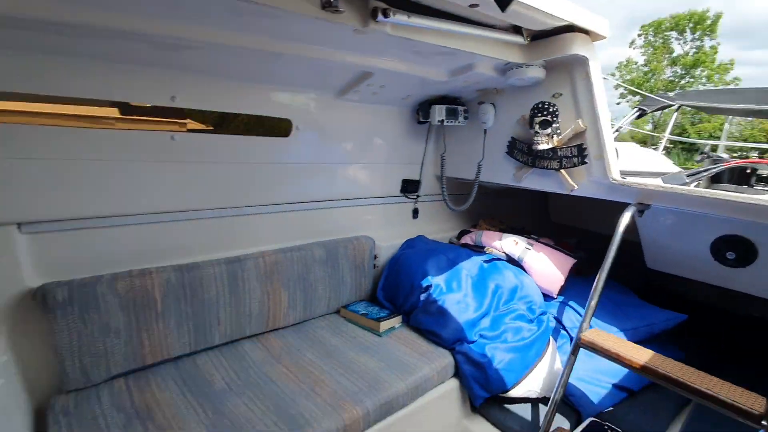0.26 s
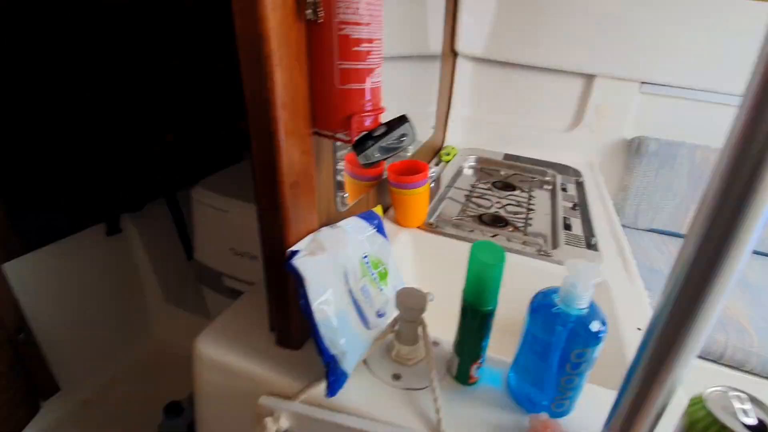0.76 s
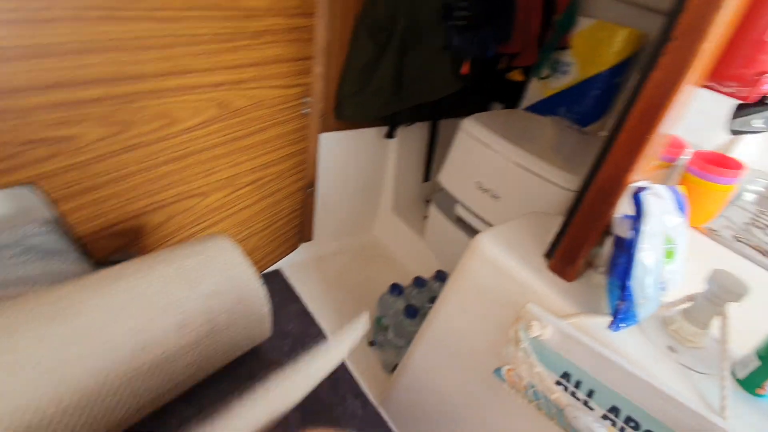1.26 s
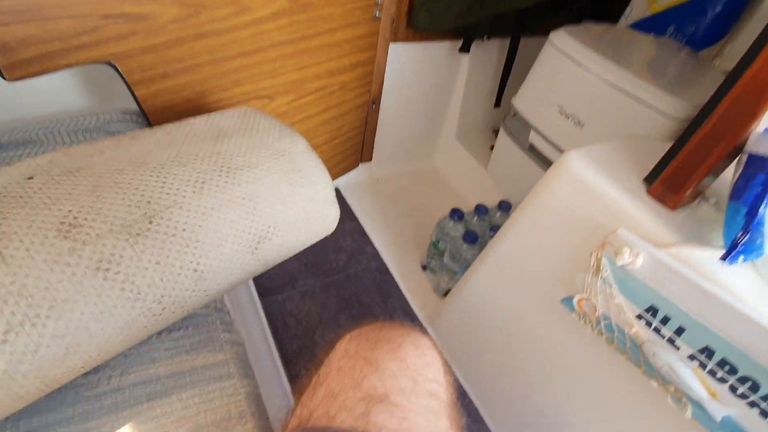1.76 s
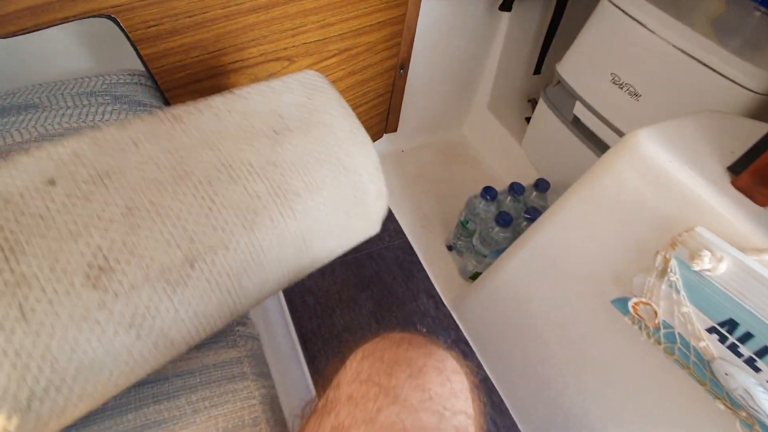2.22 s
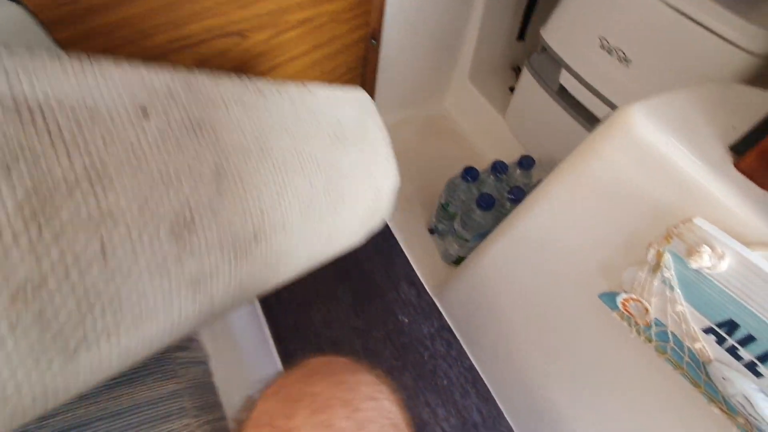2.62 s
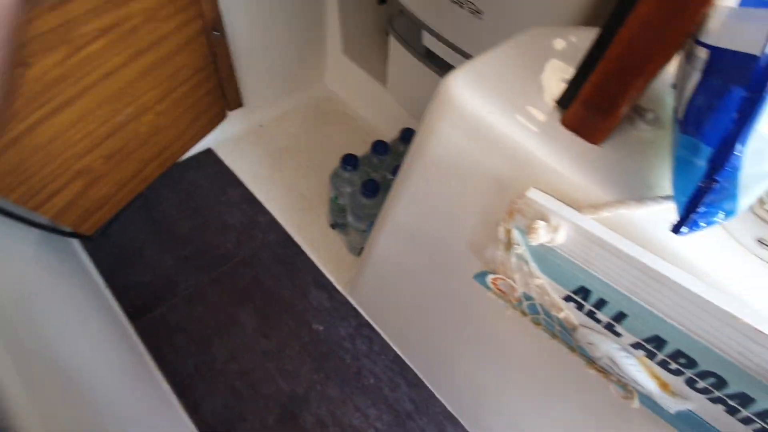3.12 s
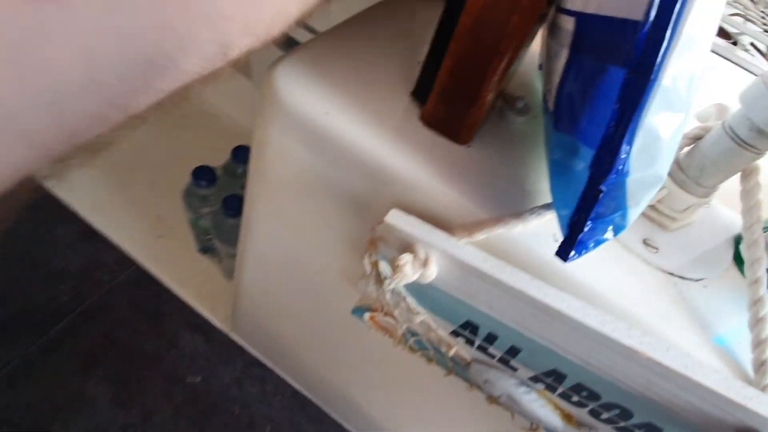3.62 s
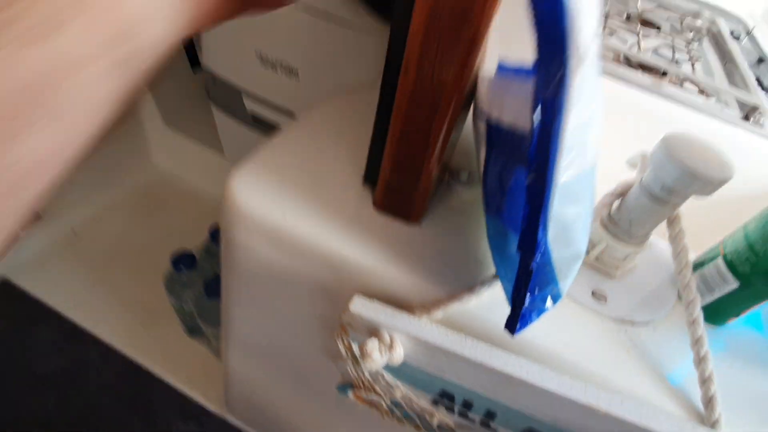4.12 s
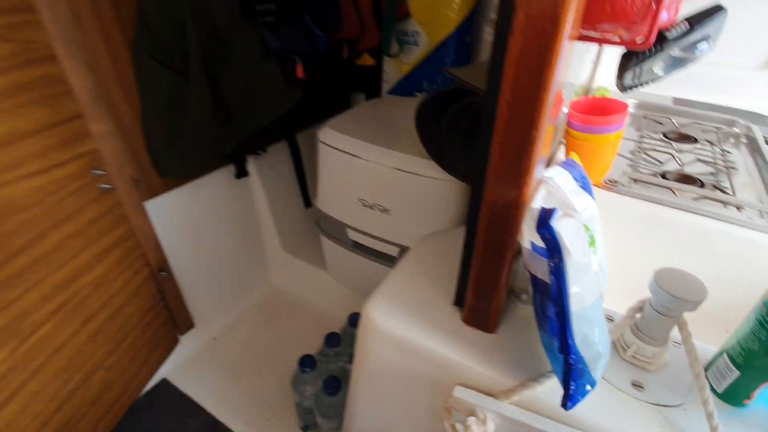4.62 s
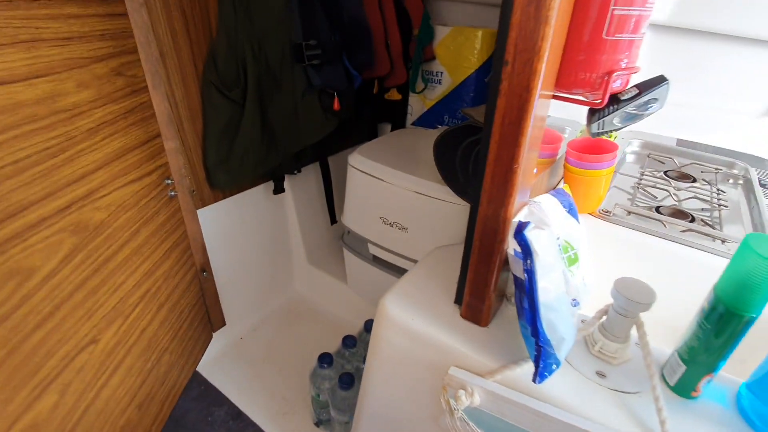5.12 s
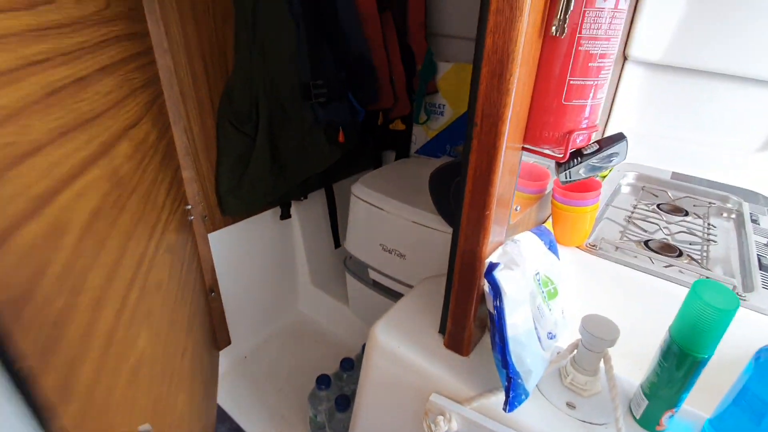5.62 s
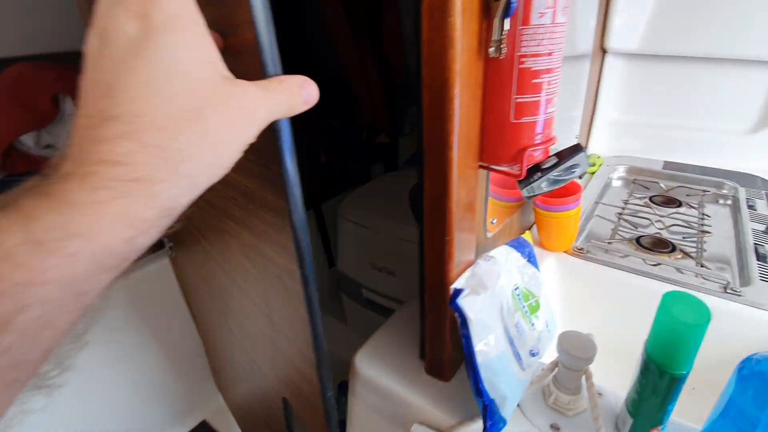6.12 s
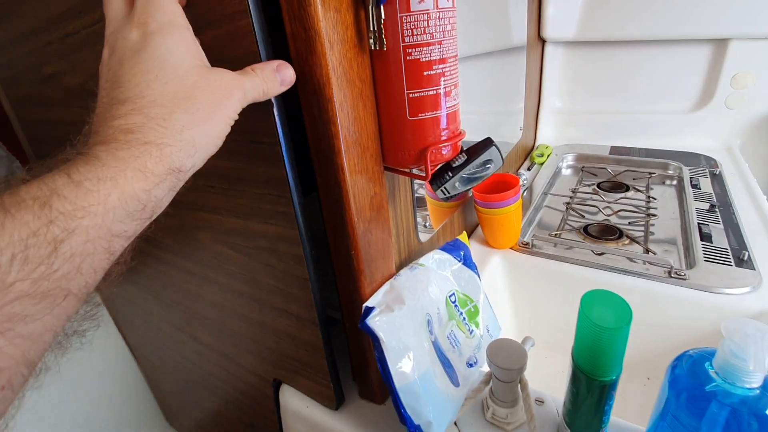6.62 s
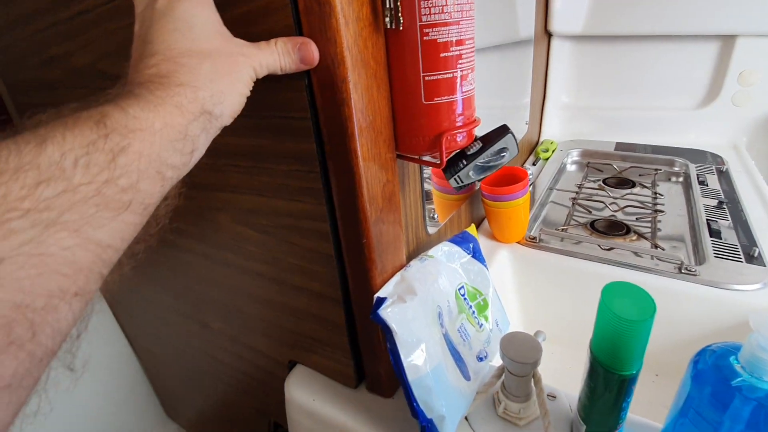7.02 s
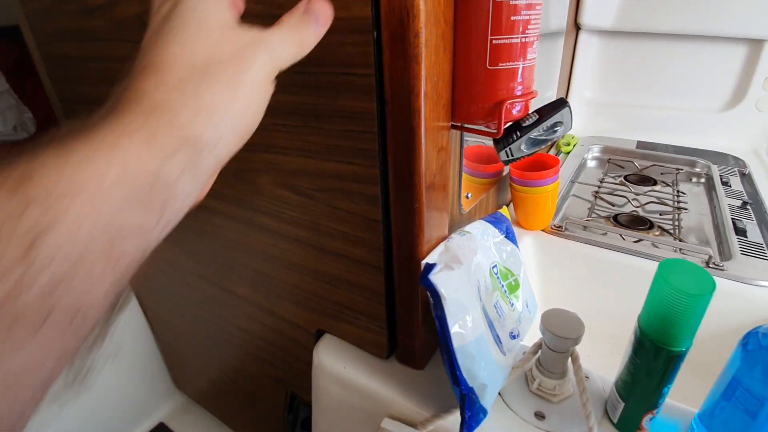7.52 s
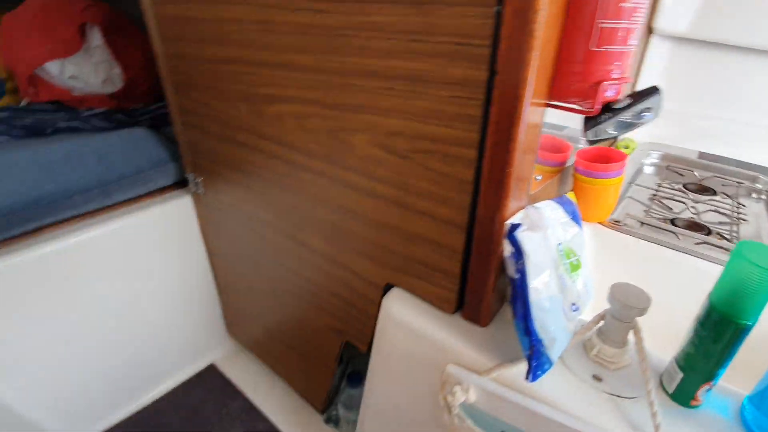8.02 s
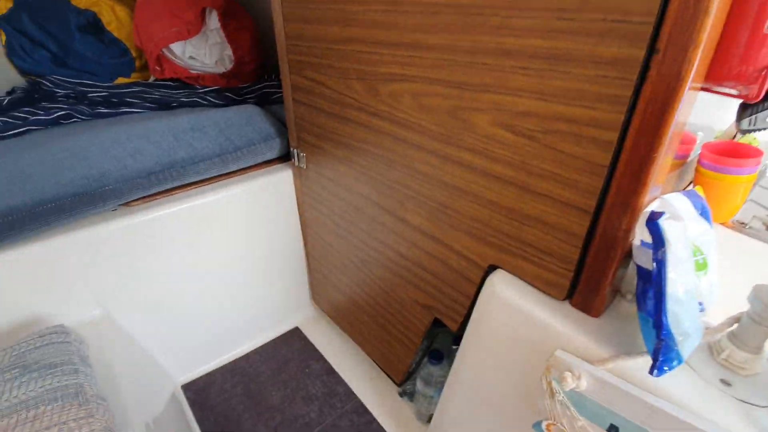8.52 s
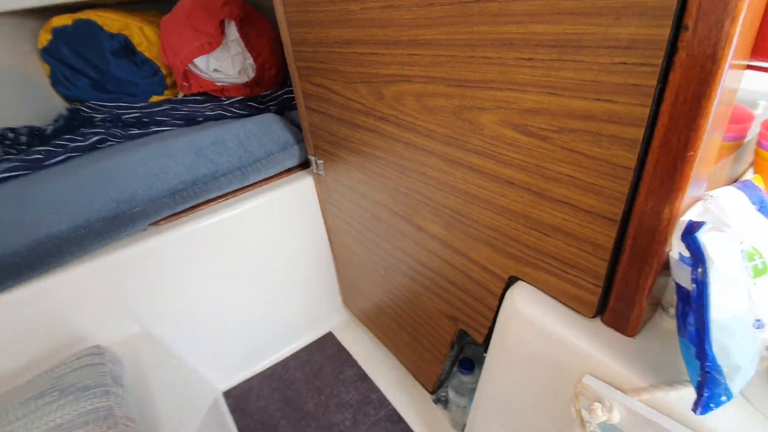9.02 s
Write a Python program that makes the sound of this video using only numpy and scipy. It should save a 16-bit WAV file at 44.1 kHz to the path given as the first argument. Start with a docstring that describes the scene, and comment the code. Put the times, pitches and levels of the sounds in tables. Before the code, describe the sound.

A small boat cabin with low hull rumble and faint motor hum. Close by, a cushion is rubbed and shifted with soft bumps, then lands with a loud, boomy cluster of thuds and hard knocks. Quieter taps follow, a faint hinge flutter, a door thumping shut with a click, and a last burst of cloth rustle. Close stereo microphone, leaning slightly to one side.

```python
"""First a low rumble of hull and water, faint air and distant motor hum inside a small boat cabin.
Close by, someone moves about: cloth rustles, a cushion is handled and dropped, a latch clicks, a door shuts.
Cloth, air and rumble are shaped noise; knocks and ticks are noise bursts through resonances.
Blows ring the hull panels as decaying sines, motors are wavering sines, hinge and scrape are narrow noise.
Two microphone ports hear most of it from one side."""
import sys
import numpy as np
from scipy import signal
from scipy.fft import rfft, irfft, next_fast_len
from scipy.io import wavfile
from scipy.ndimage import uniform_filter1d

SR = 44100
rng = np.random.default_rng(int(sys.argv[2]) if len(sys.argv) > 2 else 0)


def store_pcm(level_fs):
    """Save levels as 16-bit WAV."""
    pcm = np.round(np.clip(level_fs, -1, 1) * 32767).astype(np.int16)
    wavfile.write(sys.argv[1], SR, np.atleast_2d(pcm).T)


N = 408366
FFT_N = next_fast_len(N)
T, HZ = np.arange(N) / SR, np.fft.rfftfreq(FFT_N, 1 / SR)

# Rumble of water and hull around the cabin. Each row: time in seconds, level in dB.
RUMBLE_LEVEL = [(0, -51.5), (.3, -50), (1, -54.5), (2.2, -54), (3.4, -56), (4.5, -55.5), (5.5, -56),
                (6.6, -53), (7.8, -56.5), (9.26, -51.5)]
# Colour of the rumble. Each row: frequency in Hz, density in dB per Hz.
RUMBLE_COLOUR = [(8.8, -40.5), (15, 3.5), (43, 7), (57, -1.5), (97, -3), (145, -2), (189, -21.5),
                 (300, -25), (390, -55.5), (660, -120)]
# Colour of the cabin air. Each row: frequency in Hz, density in dB per Hz.
AIR_COLOUR = [(120, -33), (200, -2.5), (305, 2.5), (394, -12.5), (465, 1), (836, -24), (1160, -25),
              (1980, -14.5), (3130, -21), (7540, -27), (8900, -37.5), (14100, -23), (16000, -41)]
AIR_DB = -72.5

# Motor heard far off, the stronger one. Each row: time in seconds, pitch in Hz, level in dB.
NEAR_MOTOR = [(4.4, 127.4, -58), (5.3, 131.1, -59), (6, 131.4, -48), (6.7, 132.5, -46), (7.6, 135.9, -49.5),
              (8.4, 139, -49.5), (9.26, 136.5, -51.5)]
# Motor further off, heard early. Each row: time in seconds, pitch in Hz, level in dB.
FAR_MOTOR = [(0, 159.6, -62.5), (.6, 158.5, -62.5), (1.4, 153, -70), (2.4, 163.8, -74), (3.5, 170, -81)]
# Drone joining late. Each row: time in seconds, pitch in Hz (sounded at 0.99 of it), level in dB.
LATE_DRONE = [(7.4, 92, -67.5), (8, 91, -53), (8.6, 88.65, -52.5), (9.26, 91.6, -54)]
# Deep throb through the hull. Each row: time in seconds, pitch in Hz, level in dB.
THROB = [(0, 32.18, -58), (2, 31.5, -47), (4.5, 31.5, -52.5), (6.5, 32.1, -52), (9.26, 31, -53)]
# Partials of the stronger motor. Each row: multiple of the pitch, level in dB added to the curve.
NEAR_ORDERS = [(1, -2)]
# Partials of the further motor. Each row: multiple of the pitch, level in dB added to the curve.
FAR_ORDERS = [(1, 3), (2, -15.5), (3, -10)]

# Steady rustle of moving about, close by. Each row: time in seconds, body level in dB,
# crisp treble in dB re body, dull lows in dB re body.
RUSTLE = [(0, -82.5, -6, 7), (.5, -82.5, -2, 2), (.72, -74.5, -8.5, 5), (1.0, -62.5, -9, 0),
          (1.3, -78, 2.5, 2.5), (1.55, -55.5, -10.5, -5), (2.25, -53, -11.5, -8.5), (2.93, -61, -8, -1.5),
          (3.47, -64, -1.5, -1.5), (3.99, -60, -10, 8), (4.22, -79, -0.5, 5.5), (5.2, -72, -8, -1),
          (6.0, -77.5, -3, 6), (6.6, -72.5, -5.5, 8), (7.33, -92.5, -5.5, 16), (7.96, -67.5, -3, -0.5),
          (8.5, -63, -8, -2.5), (8.89, -54.5, -6.5, -0.5), (9.05, -60, -7, -2.5), (9.12, -70.5, 1.5, 0),
          (9.26, -65, -0.5, -0.5)]
# Single strokes of cloth or skin. Each row: start in seconds, length in seconds, peak position as a
# share of the length, peak level in dB, crisp treble in dB re peak, dull lows in dB re peak.
STROKES = [(0.845, 0.093, 0.45, -62.5, 2, -8), (1.071, 0.23, 0.35, -59.5, 1.5, -4.5),
           (1.413, 0.091, 0.67, -58.5, -8.5, -9), (1.521, 0.12, 0.6, -41, -9, -18),
           (1.646, 0.095, 0.52, -49.5, -7.5, -16), (1.915, 0.076, 0.61, -43.5, -14, -9),
           (2.015, 0.13, 0.24, -42.5, -16, -12), (2.15, 0.074, 0.64, -52, -8, -32),
           (2.287, 0.063, 0.47, -37, -14, -11), (2.315, 0.64, 0.15, -45, -11, -15),
           (2.646, 0.064, 0.5, -55, -10, -16), (2.702, 0.25, 0.44, -57, -3.5, -25),
           (4.785, 0.16, 0.16, -74.5, 6, -7), (4.892, 0.23, 0.12, -68, -0.5, -2.5),
           (5.377, 0.67, 0.19, -71.5, 2, -5.5), (6.786, 0.26, 0.51, -57, -6, -5),
           (7.124, 0.081, 0.21, -63, -9.5, 1.5), (7.198, 0.14, 0.26, -72, -3.5, 11),
           (7.994, 0.13, 0.42, -57.5, -2.5, -10), (8.165, 0.1, 0.38, -59, -12, -6),
           (8.297, .1, 0.43, -58, -10.5, -7), (8.516, 0.28, 0, -60, -8, -9)]
# Body of the rubbed cloth. Each row: frequency in Hz, density in dB per Hz.
CLOTH_BODY = [(410, -38), (700, -9), (922, -9), (1620, -0.5), (1790, 1), (2170, -3), (3090, -11.5),
              (3800, -17), (4960, -24), (5500, -20.5), (7150, -51.5)]
# Crisp treble of the cloth. Each row: frequency in Hz, density in dB per Hz.
CLOTH_TREBLE = [(2350, -29), (4000, -5.5), (4960, -12.5), (7060, -9.5), (9770, -19), (12400, -12),
                (15100, -16.5), (16000, -28)]
# Dull lows of the cloth. Each row: frequency in Hz, density in dB per Hz.
CLOTH_LOWS = [(120, -36), (200, 0.5), (307, 3), (377, -3.5), (471, 7.5), (644, -7.5), (845, -9.5),
              (1100, -14), (1430, -39), (2420, -120)]

# Light ticks of small hard parts. Each row: start in seconds, level in dB, ring in Hz,
# rise in seconds, t60 in seconds.
TICKS = [(.855, -52, 840, 0.007, 0.16), (1.865, -45, 2900, .0005, .03), (4.161, -55.5, 2690, .008, 0.1),
         (4.799, -59.5, 6100, .0004, 0.11), (5.839, -64.5, 3890, .01, 0.24),
         (5.868, -64, 2650, 0.0025, 0.12), (5.87, -65.5, 4140, 0.0091, 0.17),
         (5.914, -67, 3930, .012, 0.19), (6.497, -67, 2490, 0.00095, 0.046), (6.778, -59, 835, .002, 0.27),
         (7.043, -43, 3170, .0002, 0.053), (7.044, -55, 1025, .001, 0.15),
         (8.538, -52.5, 2440, .0005, 0.04), (8.592, -58, 4550, .0005, 0.055)]
SHARPNESS, CHATTER_S = 2.1, 0.0061  # ring Hz per Hz of width; a rise this slow halves the width

# Blows into the hull. Each row: start in seconds, peak in dB, pitch in Hz of the panel struck,
# left minus right in dB, damping as a factor on the ring time.
THUMPS = [(1.601, -37, 330, 3, 0.64), (2.285, -41, 40, -1, 0.99), (2.549, -48, 304, 3, 0.99),
          (2.671, -39.5, 263, 2, 0.68), (3.568, -12.5, 81.5, 2.5, 1.94), (3.609, -23, 66.5, 2, 5.6),
          (3.684, -14.5, 46.8, 1, 3.7), (3.719, -7.5, 49, 2.5, 0.69), (3.723, -21, 480, -1, 0.34),
          (3.767, -11, 56, 5.5, 1.8), (3.812, -13.5, 71.7, 14, 1.47), (3.853, -24, 53.2, -6, 0.48),
          (3.945, -21.5, 56, 10, 1.5), (3.998, -31, 40.7, 12, 1.3), (4.083, -30, 45.1, 12, 0.98),
          (4.128, -46, 311, 2, 0.49), (4.203, -38, 45, 6, 1.44), (4.798, -42.5, 88.5, 3, 2.7),
          (4.861, -38, 47.2, 0.5, 1.5), (4.949, -36, 138, 1.5, 1.3), (6.501, -52.5, 398.6, -1, 0.34),
          (6.931, -25, 106, 3, 1.2), (6.94, -19, 46.7, 2.5, 1.46), (6.946, -36, 330, 2, 1.6),
          (7.029, -26.5, 54.9, 2, 0.83), (7.089, -33, 50.5, 3, 1.8), (8.352, -34, 37.05, 0, 0.83),
          (8.426, -26.5, 78.5, 2.5, 5.9), (8.444, -28, 58.3, -2, 1.8), (8.477, -38, 64.6, 2, 1.1),
          (8.642, -54, 470, 0, 0.77), (8.891, -39.5, 101, 4.5, 2.3)]
# Hull panels. Each row: pitch in Hz, level in dB, t60 in seconds.
HULL_PANELS = [(32.4, -10, .3), (43.9, 2, 0.17), (60, 3.5, 0.047), (64.6, -7, 0.17), (90.1, 5.5, 0.066),
               (112.5, -1.5, 0.12), (150.5, 5.5, 0.13), (189, -6, 0.45), (250, -0.5, 0.0651),
               (310.3, -1, 0.22), (352, -5.5, 0.17), (500, -21, 0.085)]

# Hard contacts close by. Each row: start in seconds, body level in dB, treble in dB re body,
# top treble in dB re body, lows in dB re body, pitch in Hz of the spot struck, rise in seconds,
# rattle before the fall in seconds, t60 in seconds of the body.
KNOCKS = [(2.284, -46.5, -9.5, -17, -2.5, 1890, .001, 0.006, 0.12),
          (2.311, -54, -9.5, -29, -13, 1500, .0005, 0.002, 0.045),
          (3.557, -33, -4.5, -11, 1, 3370, 0.0017, 0.022, 0.45),
          (3.604, -26, -6.5, -16, -10, 1090, 0.007, 0.021, 0.16),
          (3.612, -17.5, -20, -28, -4, 2350, 0.003, 0.0055, 0.091),
          (3.644, -40, -2.5, -8.5, 2, 1880, 0.0035, 0.022, 0.21),
          (3.679, -39.5, -2.5, -9, 13.5, 2260, 0.0068, 0.03, 0.11),
          (3.72, -33.5, -31, -37, 7.5, 1640, .001, .008, 0.087),
          (3.746, -34.5, -23, -41, 8.5, 1495, 0.0011, 0.0073, 0.23),
          (3.807, -44.5, -16, -28, 1, 2010, 0.0015, 0.011, 0.32),
          (3.894, -37.5, -12.5, -24, 2, 2130, 0.0016, 0.017, 0.11),
          (4.117, -59, -7.5, -34, 9.5, 2000, 0.004, 0.0083, 0.14),
          (4.933, -36, -7.5, -14.5, -11, 2200, 0.0024, 0.0087, 0.1),
          (6.931, -34, -6, -25, -2.5, 4030, 0.0023, 0.041, 0.067),
          (6.949, -51.5, -13, -28, 9, 1900, 0.0052, 0.018, 0.29)]
# Body of a knock. Each row: frequency in Hz, density in dB per Hz.
KNOCK_BODY = [(450, -34.5), (700, -5), (1050, -7), (1500, -1.5), (2400, -4), (3000, -9.5), (4300, -12),
              (5000, -28), (6500, -50.5)]
# Treble of a knock. Each row: frequency in Hz, density in dB per Hz.
KNOCK_TREBLE = [(2530, -29.5), (4300, -1.5), (4970, 1), (7420, -3), (8600, -14.5), (11200, -40.5)]
# Top treble of a knock. Each row: frequency in Hz, density in dB per Hz.
KNOCK_TOP = [(7500, -33), (9000, -1.5), (12500, 2), (15000, -0.5), (16500, -6.5)]
# Panels under a knock. Each row: frequency in Hz, density in dB per Hz.
KNOCK_LOWS = [(76, -28.5), (130, 2.5), (247, -2), (467, -5), (716, -10.5), (1100, -18), (1430, -43.5),
              (2420, -120)]
# Hard panels and fittings that ring after a contact. Each row: pitch in Hz, level in dB.
FITTINGS = [(1060, 4.5), (1460, 0), (1750, -0.5), (1935, -1.5), (2140, 0), (2410, 0), (2780, 0.5),
            (3250, -1.5), (3820, 4), (4400, 2.5)]
RING_DB, RING_WIDTH_HZ, RING_REACH_DB = 8, 60, 40.5  # level, width, and fall one octave from the spot struck
THUD_RISE_S, PANEL_DB, PANEL_WIDTH_HZ = .003, 3, 25  # the thud builds up and rings the upper hull panels

# Fluttering squeak of the hinge. Each row: time in seconds, level in dB.
SQUEAK_LEVEL = [(5.05, -80.5), (5.35, -84.5), (5.55, -77), (5.9, -91), (6.1, -71.5), (6.26, -77.5),
                (6.35, -69), (6.49, -76), (6.56, -86), (6.66, -75), (6.8, -81.5), (7.3, -83)]
# Hollow gliding scrape. Each row: time in seconds, pitch in Hz, level in dB.
SCRAPE = [(8.78, 900, -68), (8.86, 892, -65), (8.93, 640, -59.5), (9.0, 910, -60), (9.06, 1060, -65),
          (9.09, 1150, -84.5)]

# Likeness of the two microphone ports. Each row: frequency in Hz, likeness from 0 to 1.
PORT_LIKENESS = [(30, 1), (300, 0.98), (700, 0.68), (2000, 0.18), (15000, 0.18)]
# Tilt of the close sounds between the ports. Each row: frequency in Hz, left minus right in dB.
PORT_TILT = [(300, 0.5), (600, 2), (1200, -3), (2400, -3.5), (4500, -2.5), (9000, 4.5), (15000, -1)]
EDGE_HZ = 15800  # upper band limit of the recorder


def gain_of(db):
    """dB to gain."""
    return 10 ** (np.asarray(db) / 20)


def evened(x):
    """Scales to rms 1."""
    return x / np.sqrt(np.mean(x ** 2) + 1e-20)


def read(points, hz):
    """Reads a spectrum on a log-frequency axis."""
    f, value = np.transpose(points)
    return np.interp(np.log(hz + 1), np.log(f + 1), value)


def columns(rows):
    """Curve columns at every sample."""
    s, *values = np.transpose(rows)
    return [np.interp(T, s, v) for v in values]


def during(rows):
    """True between the first and last times of a curve."""
    return (T > rows[0][0]) * (T < rows[-1][0])


def drift(hz):
    """Chance wandering of rms 1: noise through a one-pole low-pass at hz."""
    pole = np.exp(-2 * np.pi * hz / SR)
    settled = signal.lfilter([1], [1, -pole], rng.standard_normal(N + SR))[SR:]
    return evened(settled)


def ports(colour, lag_s, grain=1., alike=0.85):
    """Coloured noise at both ports: partly alike, the right one late above the bass."""
    a, b = rfft(rng.standard_normal((2, N)) * grain, FFT_N)
    same = np.clip(alike * read(PORT_LIKENESS, HZ), 0, 1)
    late = np.exp(-2j * np.pi * lag_s * HZ ** 4 / (HZ ** 3 + 1360.0 ** 3))
    right = same * a * late + np.sqrt(1 - same ** 2) * b
    pair = np.array([a, right]) * gain_of(read(colour, HZ))
    return evened(irfft(pair, FFT_N)[:, :N])


def ring(x, hz, width_hz):
    """A two-pole resonance of gain about 1 at its pitch."""
    r = np.exp(-np.pi * width_hz / SR)
    poles = [1, -2 * r * np.cos(2 * np.pi * hz / SR), r * r]
    return signal.lfilter([(1 - r * r) / 2, 0, (r * r - 1) / 2], poles, x)


def patchy(x, patchy_db):
    """Patches of pitch come and go, as the touched spot shifts."""
    z = signal.stft(x, nperseg=512)[2]
    chance = rng.standard_normal(z.shape[1:])
    over_pitch = uniform_filter1d(chance, size=2, axis=0)
    patches = evened(uniform_filter1d(over_pitch, size=6, axis=1))
    return signal.istft(z * gain_of(patchy_db * patches), nperseg=512)[1][:, :N]


def floor():
    """Low rumble of hull and water, and the steady air of the cabin, both as shaped noise."""
    rumble = gain_of(columns(RUMBLE_LEVEL)[0] + 2.5 * drift(1.0)) * ports(RUMBLE_COLOUR, 0)
    air = gain_of(AIR_DB + 0.7 * drift(3.6)) * ports(AIR_COLOUR, 0.00046, alike=0.13)
    return rumble + air


def tone(rows, orders, waver_db, wander_hz):
    """Multiples of a slow pitch curve, wavering in level; silent outside the curve."""
    hz, db = columns(rows)
    turns = np.cumsum(hz + wander_hz * drift(5.1)) / SR
    # 0.2 s fades, except at the very start and end of the scene
    since_start = T - rows[0][0] + (rows[0][0] < .1)
    until_end = rows[-1][0] - T + (rows[-1][0] > 9)
    on = np.clip(np.minimum(since_start, until_end) / .2, 0, 1)
    total = np.zeros(N)
    for multiple, order_db in orders:
        level = np.sqrt(2) * gain_of(db + order_db + waver_db * drift(24.0))
        total += level * np.sin(2 * np.pi * (multiple * turns + rng.random()))
    return on * total


def motors():
    """Distant motor tones carried by the hull, alike at both ports."""
    hum = tone(NEAR_MOTOR, NEAR_ORDERS, 0.84, 0.21)
    hum += tone(FAR_MOTOR, FAR_ORDERS, 2.95, 0.36)
    hum += tone(LATE_DRONE, [(0.99, 0)], 2.73, 1.0)
    hum += tone(THROB, [(1, -2.5), (2, -9.5)], 0.81, 0.68)
    return np.array([hum, hum])


def strokes():
    """Levels of body, treble and lows: the steady rustle plus one arch of power for each stroke."""
    rub_db, crisp_db, dull_db = columns(RUSTLE)
    power = gain_of(rub_db + np.array([0 * T, crisp_db, dull_db])) ** 2
    for s, length, peak, db, crisp_db, dull_db in STROKES:
        skew = np.log(.5) / np.log(np.clip(peak, .1, .9))  # puts the top of the arch at the peak
        share = np.arange(0, length, 1 / SR) / length
        arch = np.sin(np.pi * share ** skew) ** 2
        levels = gain_of(db + np.array([[0], [crisp_db], [dull_db]]))
        at = round(s * SR)
        power[:, at:at + len(arch)] += (levels * arch) ** 2
    return np.sqrt(power)


def rubbing():
    """Fibres slip in clumps of tiny snaps; one stroke drives body, treble and lows."""
    snap_here = rng.random(N) < 400 / SR  # about 400 snaps a second
    snap_db = 3.5 * np.minimum(rng.exponential(1, N), 4)
    snaps = 1 + 1.2 * snap_here * gain_of(snap_db)
    colours = (CLOTH_BODY, CLOTH_TREBLE, CLOTH_LOWS)
    cloth = sum(level * ports(colour, 0.00053, snaps) for level, colour in zip(strokes(), colours))
    return gain_of(0.87 * drift(23.0)) * patchy(cloth, 2.9)


def ticks():
    """A small part clicks or chatters, heard through its own pitch: noise in two equal resonances."""
    out, t = np.zeros((2, N)), T[:SR // 4]
    for s, db, ring_hz, rise_s, t60 in TICKS:
        a, b = rng.standard_normal((2, len(t)))
        pair = np.array([a, 0.61 * a + 1.0 * b])
        width_hz = ring_hz / SHARPNESS / (1 + rise_s / CHATTER_S)
        tick = evened(ring(ring(pair, ring_hz, width_hz), ring_hz, width_hz))
        envelope = gain_of(db - 60 * t / t60) * (1 - np.exp(-t / rise_s))
        out[:, round(s * SR):][:, :len(t)] += envelope * tick
    return out


def thumps():
    """A blow rings the hull panels tuned near the spot it lands on; it builds up over about half a cycle."""
    out, t = np.zeros((2, N + SR)), T[:SR // 2]
    hz, mode_db, t60 = np.transpose(HULL_PANELS)[..., None]
    for s, db, spot_hz, pan_db, damping in THUMPS:
        near_db = mode_db - 20.0 * np.log2(hz / spot_hz) ** 2
        modes = gain_of(near_db - 60 * t / (t60 * damping)) * np.sin(2 * np.pi * hz * t)
        swing = modes.sum(0) * (1 - np.exp(-t * spot_hz / 0.54))
        port_gain = gain_of(db + np.array([[.5], [-.5]]) * pan_db)
        at = round(s * SR)
        out[:, at:at + len(t)] += port_gain * swing / abs(swing).max()
    return out[:, :N]


def knocks():
    """Each contact starts with a tick, rattles unevenly, rings the fittings tuned near its spot, then dies."""
    rattle = gain_of(1.8 * drift(480.0))
    colours = (KNOCK_BODY, KNOCK_TREBLE, KNOCK_TOP)
    body, treble, top = (rattle * patchy(ports(colour, .00045), 1.5) for colour in colours)
    lows = ports(KNOCK_LOWS, 0.0011)
    out, t = np.zeros((2, N)), T[:SR // 2]
    for s, db, treble_db, top_db, lows_db, ring_hz, rise_s, rattle_s, t60 in KNOCKS:
        now = slice(round(s * SR), round(s * SR) + len(t))
        tick = 1 + 2.0 * np.exp(-t / .004)
        up = gain_of(db) * (1 - np.exp(-t / rise_s)) * tick
        fall_db = -60 * np.maximum(t - rattle_s, 0) / t60
        hard = up * gain_of(fall_db) * body[:, now]
        out[:, now] += hard
        for hz, mode_db in FITTINGS:
            near_db = RING_DB + mode_db - RING_REACH_DB * np.log2(hz / ring_hz) ** 2
            out[:, now] += gain_of(near_db) * ring(hard, hz, RING_WIDTH_HZ)
        high = gain_of(treble_db) * treble[:, now] + gain_of(top_db) * top[:, now]
        out[:, now] += up * gain_of(0.99 * fall_db) * high
        thud_rise = 1 - np.exp(-t / THUD_RISE_S)
        thud = up * thud_rise * gain_of(lows_db + 0.97 * fall_db) * lows[:, now]
        panels = sum(ring(thud, hz, PANEL_WIDTH_HZ) for hz, _, _ in HULL_PANELS[-3:])
        out[:, now] += 0.91 * thud + gain_of(PANEL_DB) * panels
    return out


def hinge():
    """Noise in a narrow pair of resonances, fluttering as the door swings."""
    noise = ports([(20, 0.001), (20000, 0)], 0.0001)
    squeak = evened(ring(ring(noise, 1422, 90), 1440, 90))
    level = gain_of(columns(SQUEAK_LEVEL)[0] + 4.5 * drift(14.))
    return squeak * level * during(SQUEAK_LEVEL)


def scrape():
    """Noise in one resonance that follows the gliding pitch."""
    hz, db = columns(SCRAPE)
    turn = np.exp(2j * np.pi * np.cumsum(hz) / SR)
    r = np.exp(-np.pi * 220. / SR)
    noise = ports([(20, 0), (20000, 0)], .0003)
    # shift the pitch down to zero, low-pass twice, shift back up
    smoothed = signal.lfilter([1], np.convolve([1, -r], [1, -r]), noise / turn)
    band = (turn * smoothed).real
    return gain_of(db) * evened(band) * during(SCRAPE)


def scene():
    """All sources at the two ports; the close handling sounds are tilted between them."""
    tilt = gain_of(np.array([[.5], [-.5]]) * read(PORT_TILT, HZ))
    near = rfft(rubbing() + ticks() + knocks() + scrape(), FFT_N)
    handling = irfft(near * tilt, FFT_N)[:, :N]
    return floor() + motors() + handling + thumps() + hinge()


def record(dry):
    """The loudest peaks overload softly; then the band limit of the recorder."""
    soft = .95 * np.tanh(dry / .95)
    low_pass = signal.firwin(511, EDGE_HZ, window=("kaiser", 9), fs=SR)
    return signal.oaconvolve(soft, low_pass[None], "same")


dry = scene()
out = record(dry)
store_pcm(out)
```